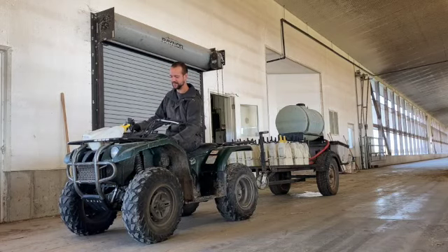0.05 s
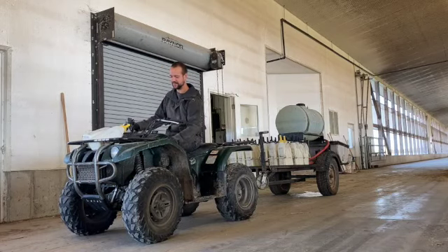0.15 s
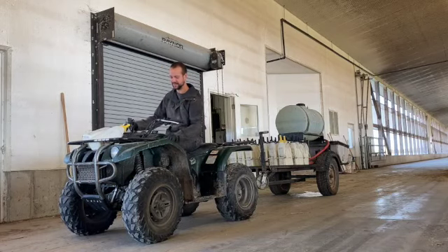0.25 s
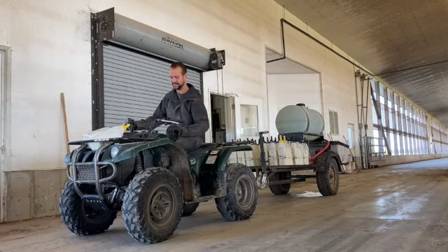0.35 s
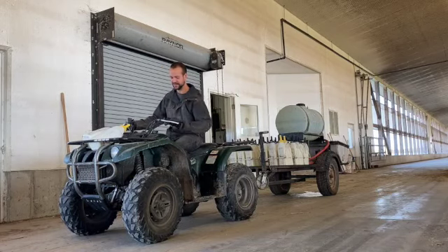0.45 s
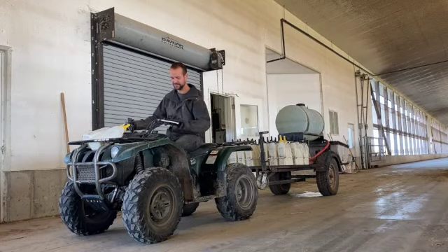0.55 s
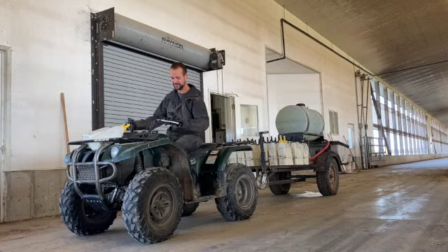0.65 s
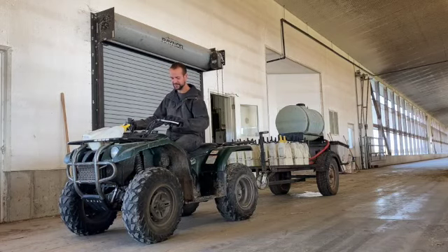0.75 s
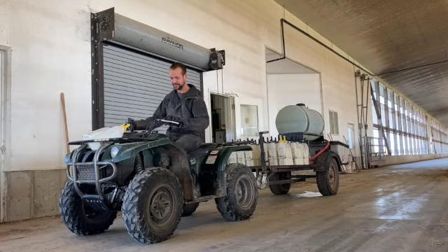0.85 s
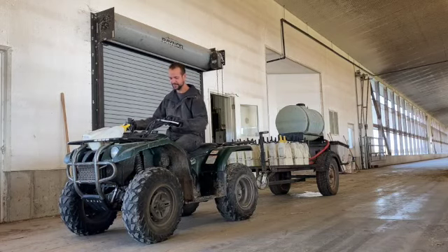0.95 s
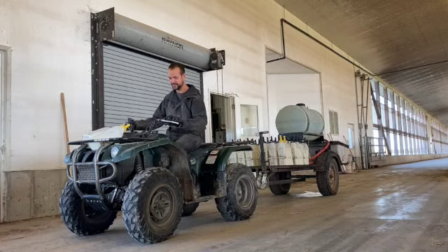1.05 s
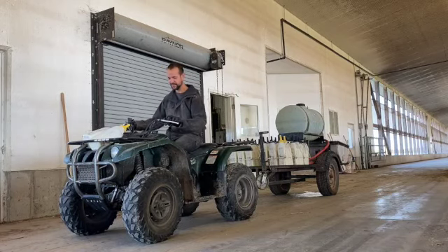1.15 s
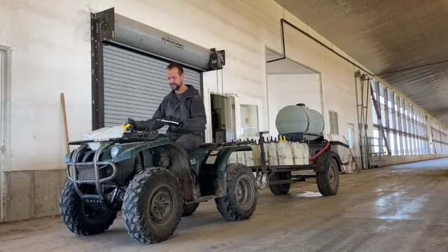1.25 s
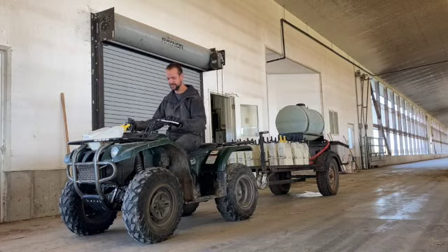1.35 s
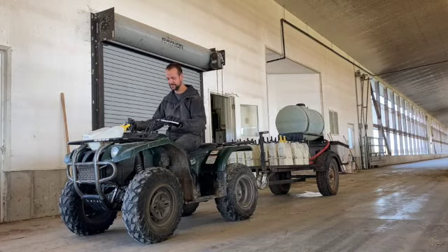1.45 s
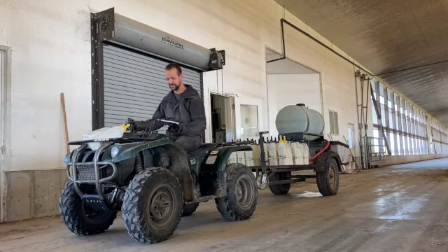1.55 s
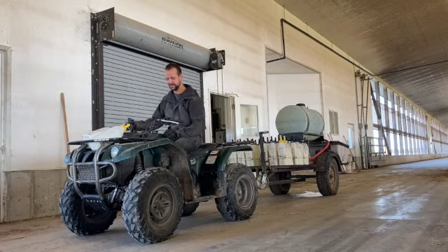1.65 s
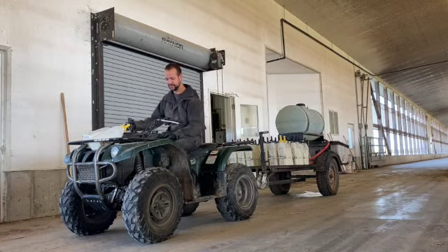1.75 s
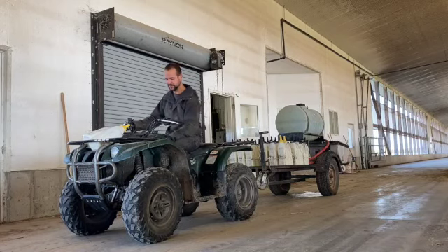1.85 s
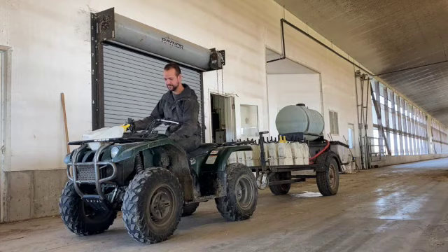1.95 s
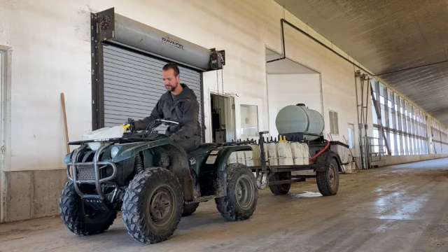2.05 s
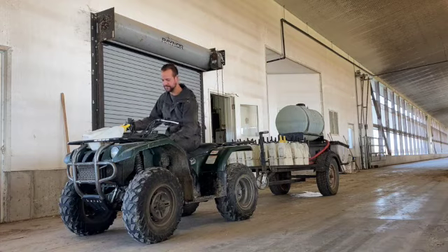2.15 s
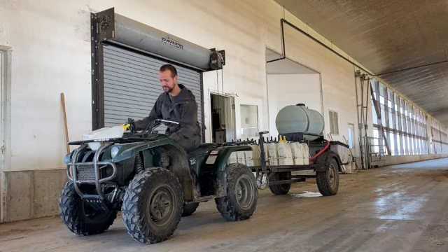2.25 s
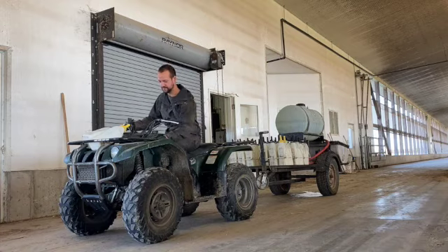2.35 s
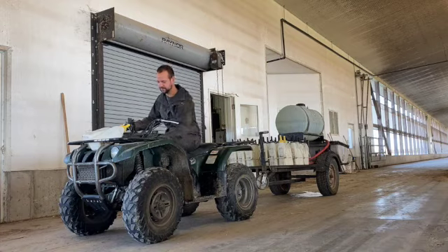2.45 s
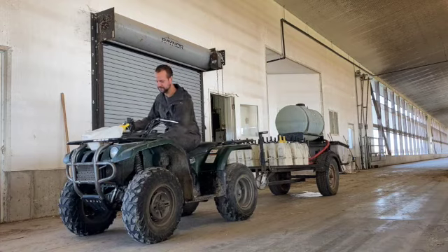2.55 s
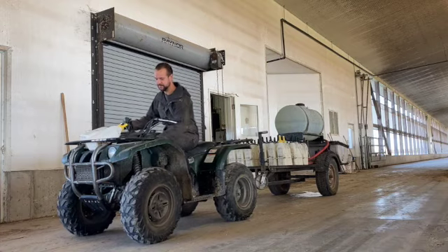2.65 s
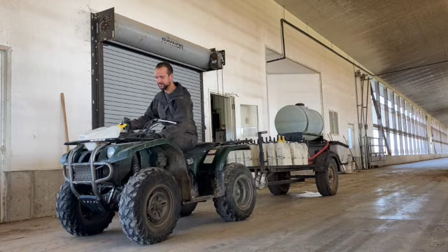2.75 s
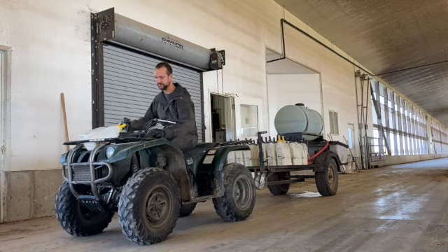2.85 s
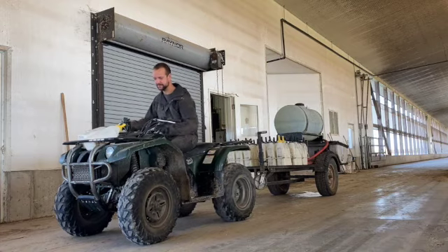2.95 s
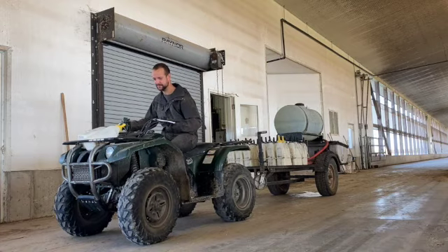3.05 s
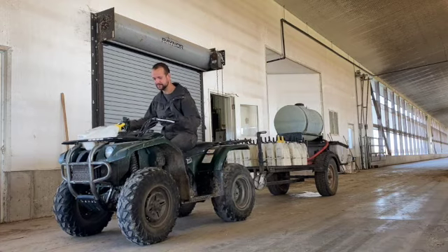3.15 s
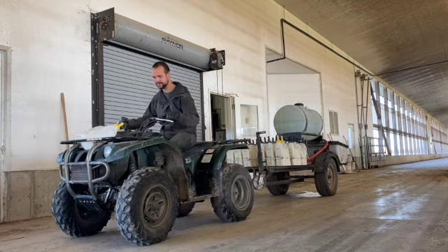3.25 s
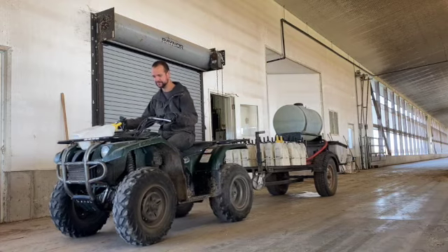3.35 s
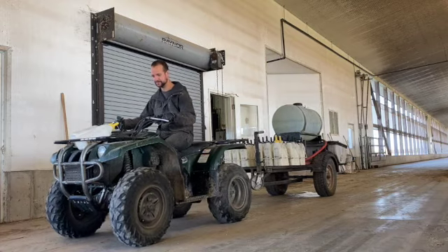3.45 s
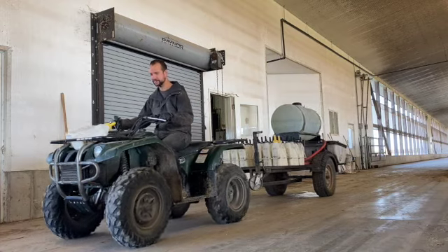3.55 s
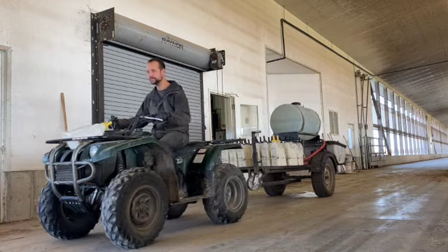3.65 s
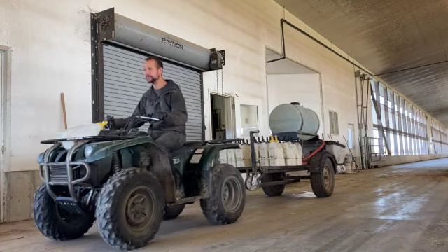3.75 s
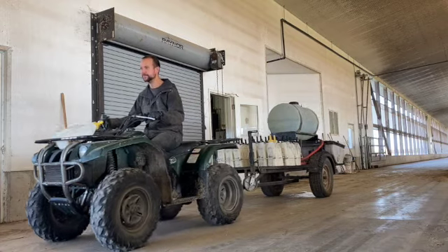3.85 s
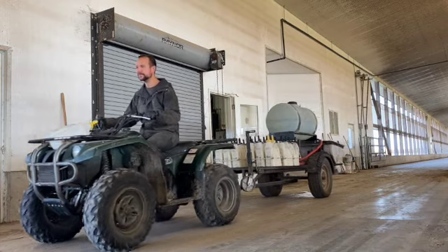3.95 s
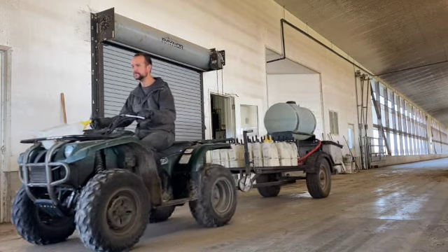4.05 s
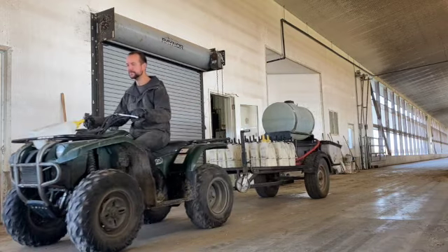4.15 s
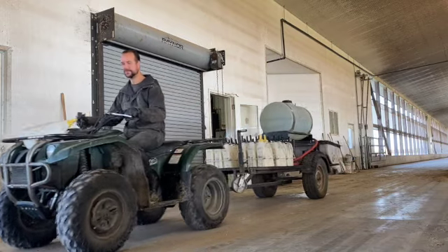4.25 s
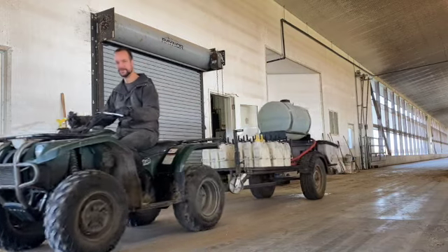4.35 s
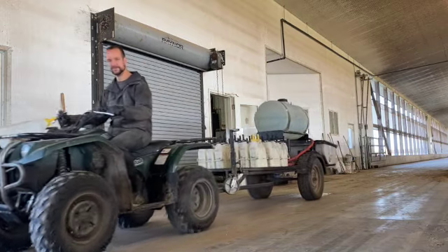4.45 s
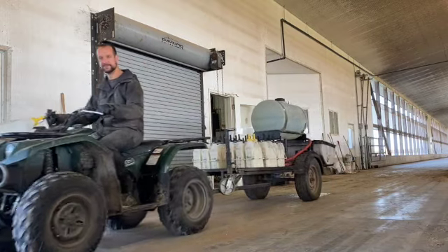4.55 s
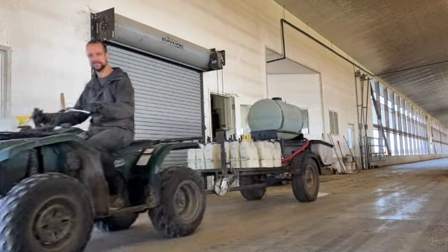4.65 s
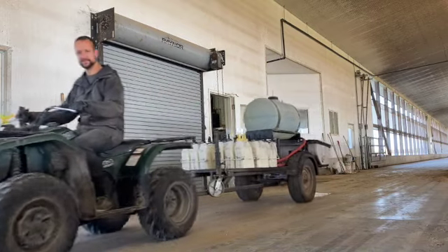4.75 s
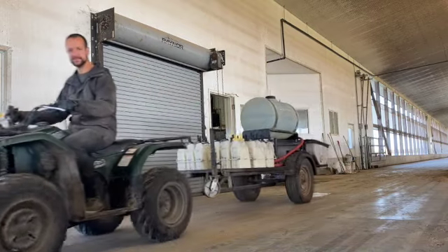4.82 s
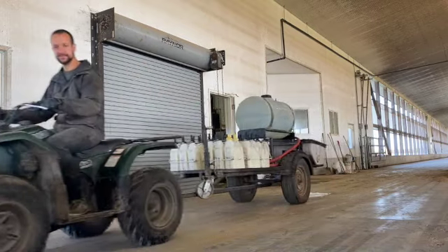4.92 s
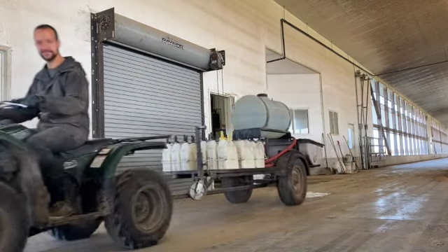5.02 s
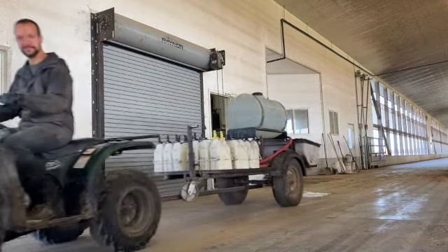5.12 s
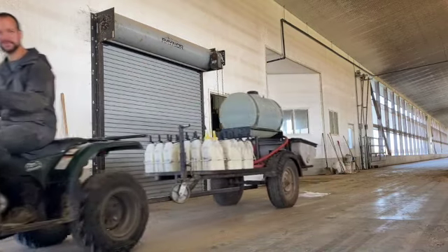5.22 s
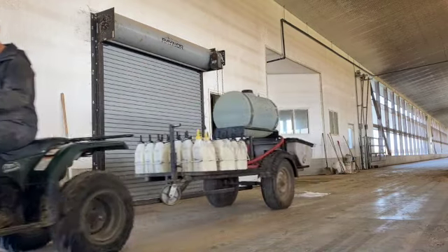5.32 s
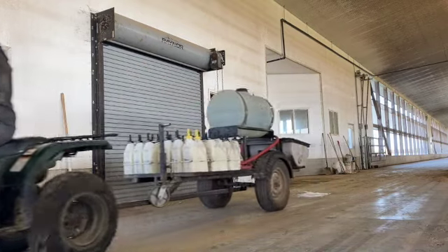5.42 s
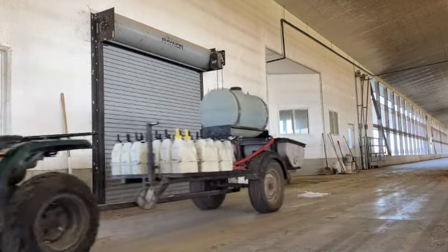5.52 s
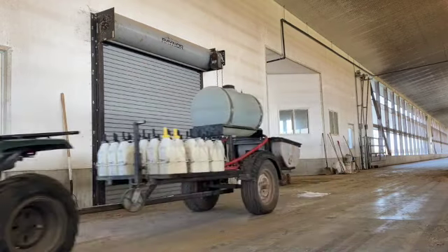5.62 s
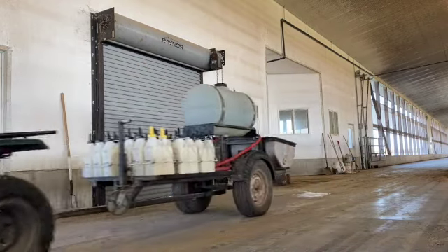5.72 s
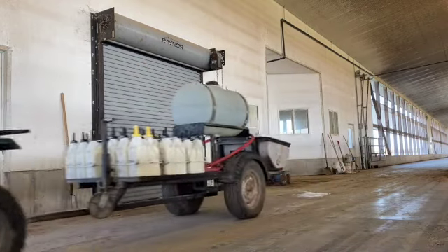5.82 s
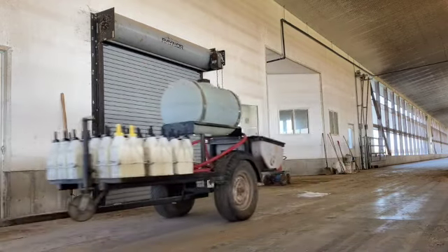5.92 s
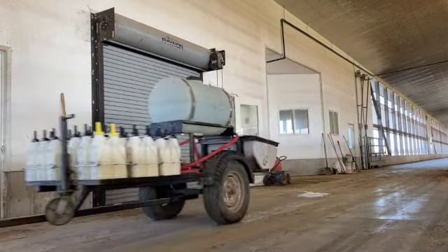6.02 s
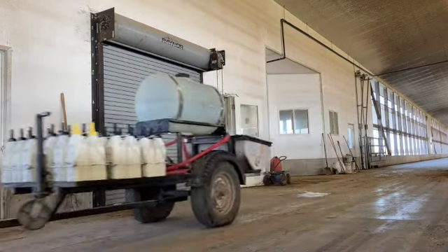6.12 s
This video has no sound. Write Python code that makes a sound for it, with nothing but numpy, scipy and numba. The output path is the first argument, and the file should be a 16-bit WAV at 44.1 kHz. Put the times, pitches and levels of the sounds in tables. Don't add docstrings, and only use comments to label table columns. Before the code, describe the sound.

Inside a long, hard-walled barn with fans humming, boots thump on a quad bike's frame and the seat creaks. A button clicks, the starter grinds briefly and the single-cylinder engine catches, flares, then settles to a lumpy, ticking idle. Near three seconds it picks up and pulls away, deep pops quickening as it passes close to a phone microphone.

```python
import sys
import numpy as np
from scipy import signal
from scipy.fft import rfft, irfft
from scipy.io import wavfile
from scipy.ndimage import uniform_filter1d
from numba import njit

SR = 44100
rng = np.random.default_rng(int(sys.argv[2]) if len(sys.argv) > 2 else 0)


def dump_mix(stems):
    frames = np.atleast_2d(stems).T
    limited = np.clip(frames, -1, 1)
    pcm = np.round(limited * 32767).astype(np.int16)
    wavfile.write(sys.argv[1], SR, pcm)


def attenuation_scalar(level_db):
    decades = np.asarray(level_db, float) / 20
    return 10 ** decades


N = 272538
T_S = np.arange(N) / SR
CATCH_S = 1.112
SWITCH_S = .921


def level(x, db):
    return x * attenuation_scalar(db) / np.sqrt(np.mean(x ** 2))


def curves(table):
    s, *columns = np.transpose(table)
    return [np.interp(T_S, s, column) for column in columns]


def swell(peak_s, db, rise_s, fall_s):
    age = T_S - peak_s
    return attenuation_scalar(db - 20 * np.where(age < 0, -age / rise_s, age / fall_s))


@njit
def svf(x, hz, width):
    y, b, l = np.empty(len(x)), 0., 0.
    for i in range(len(x)):
        g = np.tan(np.pi * hz[i] / SR)
        k = width[i] / hz[i]
        v = (b + g * (x[i] - l)) / (1 + g * (g + k))
        b, l, y[i] = 2 * v - b, l + 2 * g * v, k * v
    return y


def band(x, hz, width_hz):
    return svf(x, np.full(N, 1. * hz), np.full(N, 1. * width_hz))


def band_twice(x, hz, width_hz):
    return band(band(x, hz, width_hz), hz, width_hz)


def body(x, modes):
    return sum((-1) ** k * attenuation_scalar(db) * band(x, hz, width) for k, (hz, width, db) in enumerate(modes))


def ring(s, db, modes):
    age = np.maximum(T_S - s, 0)
    out = np.zeros(N)
    for hz, mode_db, t60_s in modes:
        decay = np.exp(-np.log(1000) * age / t60_s)
        out += attenuation_scalar(db + mode_db) * np.sin(2 * np.pi * hz * age) * decay
    return out


def coloured(spectrum):
    hz, db = np.transpose(spectrum)
    f = np.arange(N // 2 + 1) * SR / N + 1
    gain = attenuation_scalar(np.interp(np.log(f), np.log(hz), db))
    return level(irfft(rfft(rng.standard_normal(N)) * gain, N), 0)


def walk(rate_hz):
    k = int(SR / rate_hz)
    steps = np.repeat(rng.standard_normal(N // k + 1), k)
    return 0.48 * uniform_filter1d(uniform_filter1d(steps, k), k)[:N]


def grains(rate_hz, spread_db):
    when, sign, size = rng.random((N, 3)).T
    return (when < rate_hz / SR) * np.sign(sign - .5) * attenuation_scalar(-spread_db * np.log(size + .01))


def duck():
    age = T_S - CATCH_S
    recovery_db = np.minimum(-27 + age * 400, 0)
    return attenuation_scalar(np.where(age > 0, np.maximum(-age * 4000, recovery_db), 0))


# f/Hz, density/dB per Hz
ROAR_SPECTRUM = [(25, -28), (60, -9), (92, -7), (180, -14.5), (300, -20.5), (600, -22), (980, -34.5),
                 (1600, -35), (2220, -43.5), (2900, -35.5), (4200, -34), (5500, -37.5), (9000, -57.5),
                 (16000, -54)]
# f/Hz, width/Hz, level/dB
FAN_LINES = [(55, 1.5, -28), (66, 1.5, -25), (113, 4, -33), (125, 3, -31), (183, 2, -33), (2200, 500, -49),
             (3872, 2, -53), (4250, 800, -45)]


def barn():
    roar = np.array([level(coloured(ROAR_SPECTRUM) * attenuation_scalar(4.9 * walk(12)), -6.5) for _ in range(2)])
    hum = np.zeros(N)
    for hz, width, db in FAN_LINES:
        hum += level(band_twice(rng.standard_normal(N), hz, width), db + 19.5)
    cranking = np.clip((T_S - SWITCH_S) / (CATCH_S - SWITCH_S), 0, 1)
    alone_db = -18.5 - 3 * T_S + 6 * cranking
    under_engine_db = -30
    return attenuation_scalar(np.where(T_S < CATCH_S + .01, alone_db, under_engine_db)) * duck() * (roar + hum)


# t/s, peak/dB, f/Hz, treble over peak/dB, t60/s
KNOCKS = [(0.188, -13.5, 2100, -24, 0.085), (0.203, -22, 856, -18, 0.13), (0.439, -36, 1030, -24, 0.1),
          (0.591, -34, 860, -32, 0.19), (1.137, -18.5, 1420, -33, 0.27), (1.249, -18.5, 1180, -11, 0.13),
          (1.304, -9.5, 1080, -24, 0.11), (2.057, -26.5, 1690, -24, 0.069), (2.129, -31, 1750, -27, 0.091),
          (2.288, -29, 1330, -9, 0.13), (2.426, -18, 1400, -16, 0.11), (2.822, -18, 915, -34, 0.16),
          (2.884, -17, 880, -34, 0.22), (2.995, -30, 1600, -15, 0.054)]
# t/s, peak/dB
THUDS = [
    (0.196, -7),
    (.215, -5),
    (.236, -6.5),
    (1.083, -14),
]
# f/Hz, level/dB, t60/s
FRAME_MODES = [(61.6, -19, 0.12), (121, 7.5, 0.096), (204, 3, 0.083), (288, -8.5, 0.14), (343, -6.5, 0.092)]


def knocks():
    out = np.zeros(N)
    noise = rng.standard_normal(N)
    for s, db, hz, treble_db, t60_s in KNOCKS:
        thud_db = -7 - 12 * np.log2(hz / 1000)
        rise = np.clip((T_S - s) / .002, 0, 1)
        burst = noise * rise * np.exp(-np.log(1000) * np.abs(T_S - s) / max(t60_s, .01))
        metal = 2.2 * band(burst, hz, hz / 6) + 1.2 * band_twice(burst, 1500, 2300)
        thud = attenuation_scalar(thud_db) * band(burst, 510, 370)
        treble = attenuation_scalar(treble_db) * band(burst, 8100, 9000)
        out += attenuation_scalar(db) * (metal + thud + treble)
    return out - sum(ring(s, db - 8, FRAME_MODES) for s, db in THUDS)


# t/s, level/dB
SEAT_SHIFTS = [
    (.45, -35.5),
    (.6, -35),
    (.82, -39.5),
]


def seat_creak():
    creak = body(grains(400, spread_db=0), [(326, 160, -3), (565, 76, -6.5), (820, 110, -7)])
    return sum(swell(s, db, rise_s=.12, fall_s=.22) for s, db in SEAT_SHIFTS) * level(creak, 0)


# (f/Hz, level/dB, t60/s)
SWITCH = (.921, -10, [(1750, -11, .025), (3430, 4, 0.018), (5850, -4, .017), (6430, -5.5, 0.023),
          (7800, -8, 0.019), (10500, 3.5, 0.005)])


def switch_click():
    return ring(*SWITCH)


# peak t/s, level/dB, rise/s, fall/s (20 dB)
BITES = [
    (0.997, -14, 0.097, 0.0728),
    (1.07, -30.5, 0.063, 0.18),
    (1.14, -22.5, 0.015, 0.0151),
    (1.254, -32, .01, 0.3),
    (1.304, -27, .006, 0.01),
    (1.352, -27, .01, .05),
    (1.4, -25, .015, .06),
    (1.437, -28, .008, .12),
]
# f/Hz, width/Hz, level/dB
PINION_RINGS = [(680, 220, -6), (1430, 120, 0), (1650, 100, 0), (2100, 160, -1), (2720, 150, 2),
                (4300, 500, -12)]


def starter():
    bites = sum(swell(*bite) for bite in BITES) * (T_S > SWITCH_S)
    teeth = grains(2500, spread_db=2.5)
    rings = sum(attenuation_scalar(db + 12 * walk(45)) * band(teeth, hz, width) for hz, width, db in PINION_RINGS)
    clear_rings = level(rings, -4.5) * (bites / bites.max()) ** .3
    grind = clear_rings + level(band_twice(teeth, 1550, 2900), -5.5)
    brushes = level(band(teeth, 5100, 11000), 0) * attenuation_scalar(5 * walk(30))
    brushes = (bites > 0) * swell(1.15, -38, rise_s=8, fall_s=.2) * brushes
    dip = np.interp(T_S, CATCH_S + np.array([.002, .01, .02, .026]), [1, .3, .3, 1])
    return dip * (bites * grind + brushes)


def pinion_rundown():
    start_s, end_s, top_hz, low_hz = 1.135, 1.2, 3100, 950
    hz = top_hz * (low_hz / top_hz) ** np.clip((T_S - start_s) / (end_s - start_s), 0, 1)
    spin = np.clip(np.minimum(T_S - start_s, end_s - T_S) / .01 + 1, 0, 1)
    whirr = svf(svf(rng.standard_normal(N), hz, hz / 4), hz, hz / 4)
    return spin * attenuation_scalar(-32) * whirr * np.sqrt(SR / hz)


# t/s, f/Hz (firings)
SPEED = [(1.19, 10.9), (1.3, 19.4), (1.41, 23.17), (1.54, 17.84), (1.75, 12.8), (1.93, 12.11),
         (2.18, 14.62), (2.29, 14.45), (2.73, 10.58), (2.95, 18.72), (3.74, 19.39), (4.15, 21.39),
         (4.76, 22.64), (5.0, 23.66), (5.7, 29.54), (6.18, 31.24)]


def crank():
    running = T_S > SPEED[0][0]
    first_phase = .94
    return np.cumsum(curves(SPEED)[0] * running) / SR + first_phase, running


CRUISE_HZ = 19
FLARE_S, PULL_AWAY_S = (1.12, 1.4), (2.76, 7)


def effort():
    ramp_s = .08
    throttle = np.zeros(N)
    for on_s, off_s in (FLARE_S, PULL_AWAY_S):
        throttle += np.clip(np.minimum(T_S - on_s, off_s + ramp_s - T_S) / ramp_s, 0, 1)
    swing = np.interp(T_S, (4.5, 6.18), [0, 1]) ** 1.4
    return throttle, swing, curves(SPEED)[0] / CRUISE_HZ


def blend(values, throttle, swing=0):
    driven = values[0] + throttle * (values[1] - values[0])
    return driven + swing * (values[-1] - driven)


# t/s, level/dB
BOOM = [(1.2, -10.5), (1.28, -9), (1.38, -15.5), (1.5, -11), (1.68, -17.5), (1.9, -17.5), (2.15, -13.5),
        (2.55, -17), (2.68, -24.5), (2.8, -13), (2.95, -9.5), (3.15, -14), (4.0, -9), (4.6, -12),
        (5.2, -11), (5.5, -12), (6.18, -14.5)]
# f/Hz, width/Hz, level/dB
PIPE_MODES = [(147.4, 11, 7), (188.8, 29.3, 11.5), (232.3, 26, 8), (247, 13, 4.5)]


def exhaust(cycles, running):
    throttle, swing, speed = effort()
    boom_db = curves(BOOM)[0]
    pop_db = blend((-26, -19.5, -17), throttle, swing) - boom_db
    second_db = blend((-10, -5.5, -28.5), throttle, swing)
    second_db = second_db + 19.5 * np.maximum(np.log2(speed), 0)
    bark_db = blend((-9, -10, 3), throttle, swing)
    shake_db = blend((-32, -35.5, -17), throttle, swing)

    scatter = attenuation_scalar(.5 * rng.standard_normal(200)[cycles.astype(int)])
    firings = -np.diff(np.floor(cycles), prepend=0) * scatter / np.sqrt(curves(SPEED)[0])
    pulses = np.convolve(firings, np.hanning(int(.0042 * SR)), "same")
    pulses = np.roll(pulses, -int(0.00414 * SR))
    late = np.roll(pulses, int(0.01204 * SR))

    boom_hz = 91.93 - 1.68 * CRUISE_HZ * np.maximum(1 - speed, 0)
    width = blend((10.7, 17.4), throttle) + 8.4 * swing
    boom = svf(svf(svf(late, boom_hz, 4 * width), boom_hz, 2 * width), boom_hz, width) / np.sqrt(width)
    second = band(band(late, 110, 44), 113.8, 15.2)
    silencer = level(boom, 0) + attenuation_scalar(second_db) * level(second, 0)

    blow = band_twice(pulses, 186, 184)
    bark = band(band(band(pulses, 290, 90), 274, 60), 277, 55)
    pipe = sum(attenuation_scalar(db) * band(blow, hz, wide) for hz, wide, db in PIPE_MODES)
    pop = level(pipe, -1.06) + level(blow, -9) + attenuation_scalar(bark_db) * level(bark, -6)
    pop = pop + np.sin(np.pi * swing) * level(band(blow, 176, 18), -4)
    rumble = level(band(band(rng.standard_normal(N), 354, 172), 310, 205), 0)
    gas = running * attenuation_scalar(-15 - 8 * swing) * rumble
    flutter = running * attenuation_scalar(-8 * swing) * level(band_twice(rng.standard_normal(N), 365, 70), -29)

    shake = running * attenuation_scalar(shake_db) * np.sqrt(2) * np.sin(4 * np.pi * cycles)
    sound = silencer + attenuation_scalar(pop_db) * (gas - pop) + flutter
    notch = blend((0.24, 0.65, 0.34), throttle, swing) * band(sound, 164.7, 65)
    return attenuation_scalar(boom_db) * (sound - notch) + shake


# f/Hz, width/Hz, level/dB
CASING = [(850, 120, -2), (1080, 81, -4.5), (1266, 89, -6)]
# f/Hz, width/Hz, level/dB
FINS = [(2340, 300, 0), (2730, 120, -6), (3200, 260, -2), (3880, 200, -8), (4900, 300, -9)]
# f/Hz, density/dB per Hz
GAS = [(300, -36), (450, 7), (680, -12), (900, 1), (1800, 2), (3000, -6), (5000, -2.5), (8000, -20)]


def machine(cycles, running):
    throttle, swing, speed = effort()
    fast = np.maximum(np.log2(speed), 0)
    clatter_db = blend((-37.5, -33.5), throttle) + 11 * np.log2(speed)
    ring_db = blend((2.3, -4, -6.5), throttle, swing) + 14 * fast
    tick_db = blend((-0.9, -.5, -9), throttle, swing) - 18 * fast
    gas_db = blend((-8.5, -9.5, -6.5), throttle, swing)
    gas_db = gas_db + 5 * throttle * (T_S < PULL_AWAY_S[0])

    phase = cycles % 1
    valve_size, puff_size = attenuation_scalar(rng.standard_normal((200, 2))[cycles.astype(int)]).T
    tick_phase = .53 + .013 * CRUISE_HZ * np.maximum(1 - speed, 0)
    age = 1.4 * np.maximum(phase - tick_phase, 0) / .045
    seating = valve_size * age * np.exp(-age)
    scrape = band(band(seating * rng.standard_normal(N), 2010, 1130), 1695, 280)
    scrape = scrape + attenuation_scalar(-2) * band(seating * rng.standard_normal(N), 1366, 130)
    strike = valve_size * np.diff(1. * (age > .5), prepend=0).clip(0)
    valve_ring = body(strike, [(1720, 200, 1), (1350, 110, -3), (3140, 500, -9)])
    tick = level(level(scrape, 0) + level(valve_ring, -9), -3.5)

    puff = .5 + 0.77 * puff_size * np.exp(2 * (np.cos(2 * np.pi * phase) - 1))
    rattle = puff * grains(2500, spread_db=4) * attenuation_scalar(2 * walk(15))
    casing = attenuation_scalar(ring_db) * level(body(rattle, CASING), -7.5)
    fins = attenuation_scalar(ring_db / 2) * level(body(rattle, FINS), -10)
    gas = level(puff * coloured(GAS), -2.3)
    hiss = band(puff ** 2.3 * grains(16000, spread_db=3.1), 9400, 14000)
    clatter = casing + attenuation_scalar(tick_db) * tick + fins + gas
    return running * attenuation_scalar(clatter_db) * (clatter + attenuation_scalar(gas_db) * level(hiss, 0))


def gearbox(cycles):
    wobble = np.cumsum(12 * walk(40)) / SR
    mesh = np.sin(2 * np.pi * (42 * cycles + wobble))
    return swell(5.85, -36, rise_s=.4, fall_s=.15) * attenuation_scalar(3 * walk(20)) * mesh


@njit
def walls(x, lags, gain, damp):
    line, soft, out = np.zeros((8, 8192)), np.zeros(8), np.zeros((2, len(x)))
    for i in range(len(x)):
        total = 0.
        for k in range(8):
            soft[k] += (1 - damp) * (gain[k] * line[k, (i - lags[k]) & 8191] - soft[k])
            total += soft[k]
            out[k % 2, i] += soft[k]
        for k in range(8):
            line[k, i & 8191] = x[i] + soft[k] - total / 4
    return out


def scene():
    cycles, running = crank()
    blows = attenuation_scalar(2.5) * knocks()
    pipe = exhaust(cycles, running)
    near = seat_creak() + starter() + pinion_rundown() + machine(cycles, running) + gearbox(cycles)
    bike = pipe + near + switch_click() + blows

    room_t60_s, port_lag_samples = 0.43, 2
    lags = rng.integers(500, 3000, 8)
    to_walls = near + attenuation_scalar(-9) * blows + attenuation_scalar(-17) * pipe
    room = walls(to_walls, lags, attenuation_scalar(-60 * lags / SR / room_t60_s), 0.12)
    gate = np.where(running, attenuation_scalar(6), attenuation_scalar(-1) * duck() ** 0.35)
    return np.array([bike, np.roll(bike, port_lag_samples)]) + attenuation_scalar(-8.5) * gate * room + barn()


# t/s, left minus right/dB
PAN = [
    (0, 1.3),
    (1.2, 0.5),
    (4.8, 0),
    (6.18, 2),
]
# f/Hz, left late/turns
PORT_TURNS = [(5000, -.5), (7200, 0), (9000, .5), (11100, 1), (13200, 1.5), (15200, 2), (17000, 2.45)]


def ports(dry):
    mid, side = (dry[0] + dry[1]) / 2, (dry[0] - dry[1]) / 2
    side = signal.sosfilt(signal.butter(2, 260, "high", fs=SR, output="sos"), side)
    lean = attenuation_scalar(-6) * band_twice(mid, 350, 240) + attenuation_scalar(-5) * band(mid, 5500, 2600)
    side = attenuation_scalar(-7) * side + attenuation_scalar(4) * band(side, 940, 1060) + lean
    pan = attenuation_scalar(curves(PAN)[0] / 2)
    left, right = rfft((mid + side) * pan), rfft((mid - side) / pan)

    f = np.arange(N // 2 + 1) * SR / N
    right = right * (1 + attenuation_scalar(-20) * np.exp(-((f - 1280) / 150) ** 2))
    alike = np.clip((f - 4000) / 2500, 0, .85)
    treble = rfft(dry[0])
    lagged = treble * np.exp(-2j * np.pi * np.interp(f, *np.transpose(PORT_TURNS)))
    both = np.array([(1 - alike) * left + alike * lagged, (1 - alike) * right + alike * treble])
    return irfft(both * (f < 15850), N)


def band_limit(x):
    return signal.sosfilt(signal.butter(12, 16800, fs=SR, output="sos"), x)


def record(dry):
    rounded = np.tanh(0.89 * ports(dry)) / 0.84
    mix = signal.sosfilt(signal.butter(3, 30, "high", fs=SR, output="sos"), rounded)
    return band_limit(mix)


dry = scene()
out = record(dry)
dump_mix(out)
```